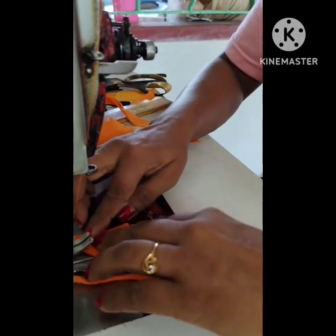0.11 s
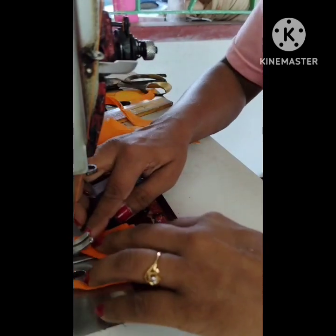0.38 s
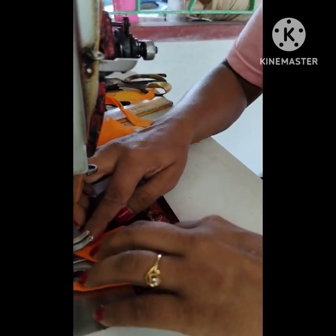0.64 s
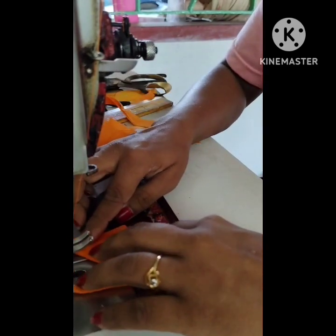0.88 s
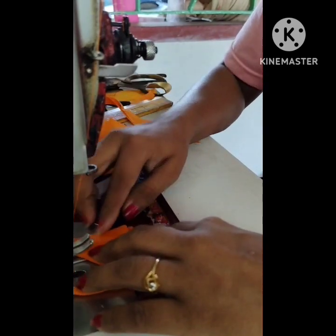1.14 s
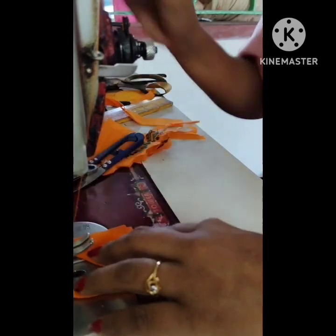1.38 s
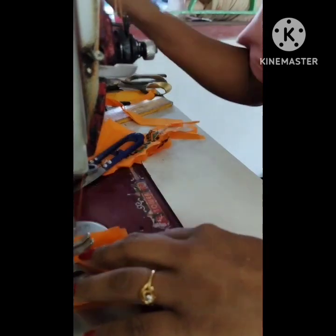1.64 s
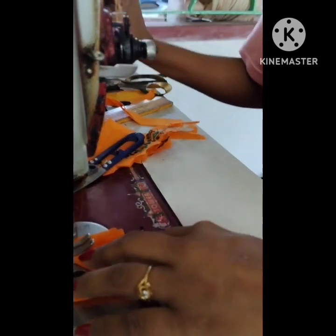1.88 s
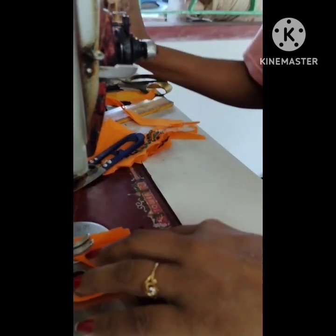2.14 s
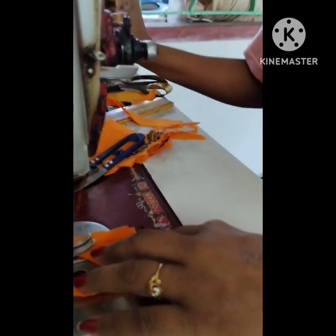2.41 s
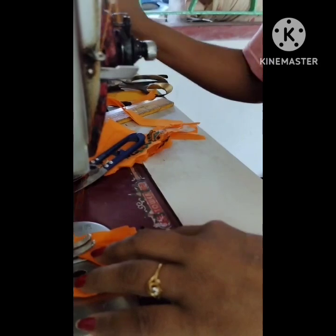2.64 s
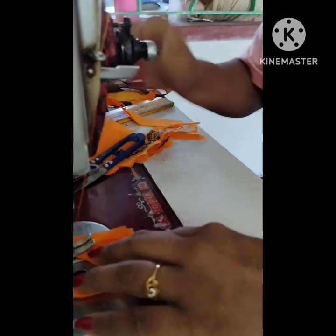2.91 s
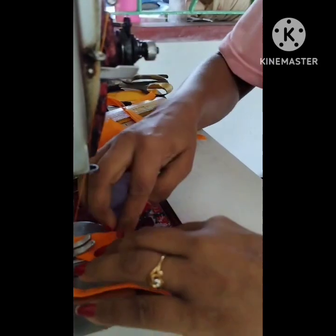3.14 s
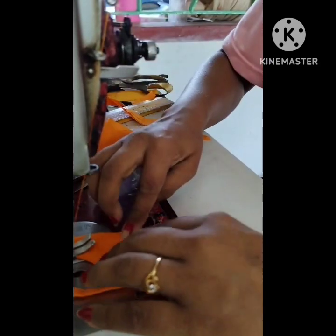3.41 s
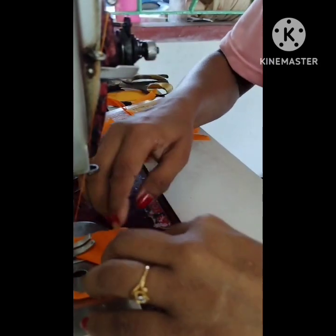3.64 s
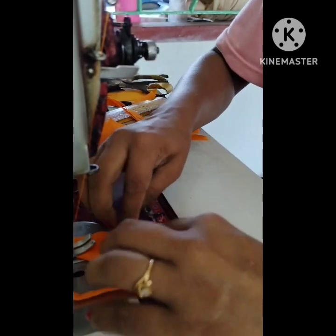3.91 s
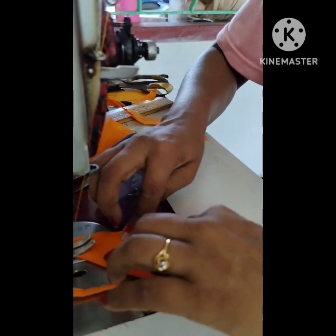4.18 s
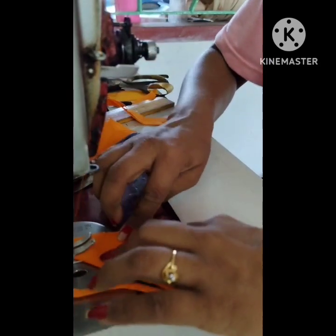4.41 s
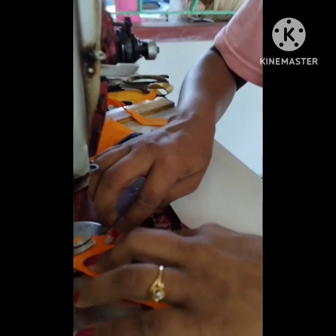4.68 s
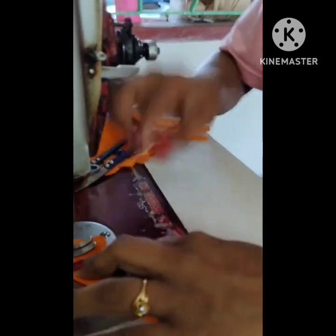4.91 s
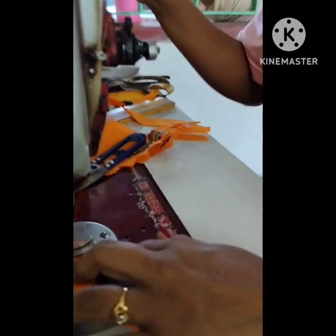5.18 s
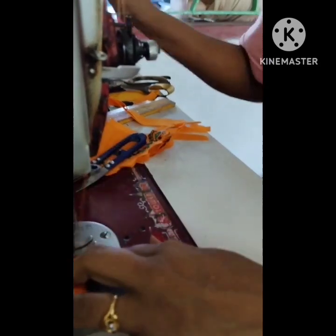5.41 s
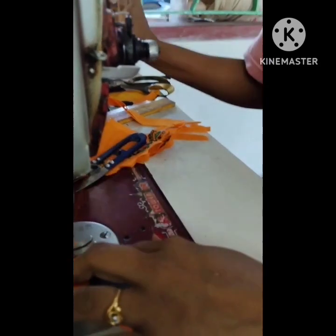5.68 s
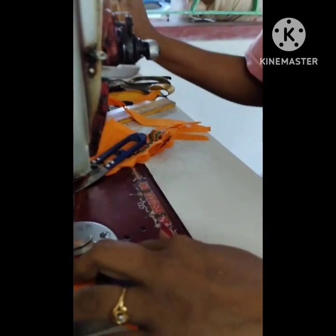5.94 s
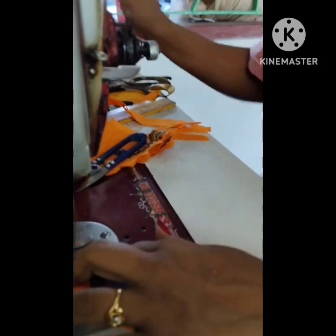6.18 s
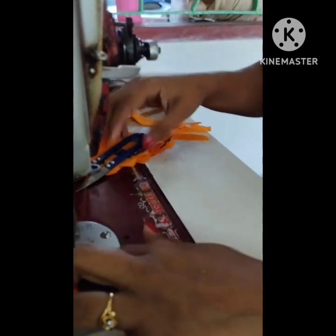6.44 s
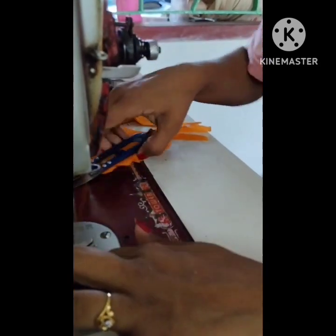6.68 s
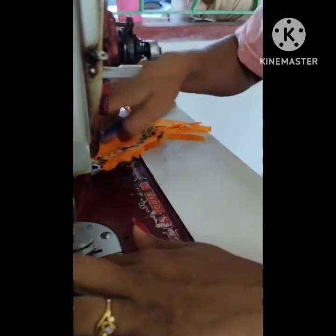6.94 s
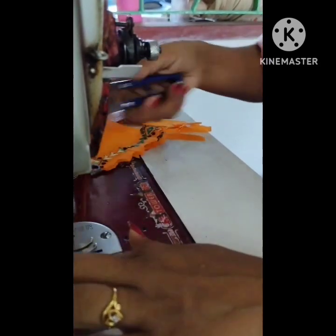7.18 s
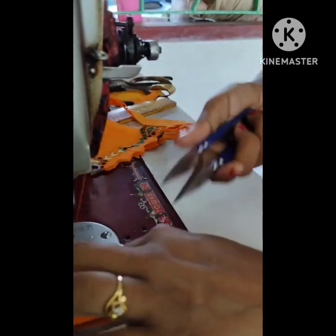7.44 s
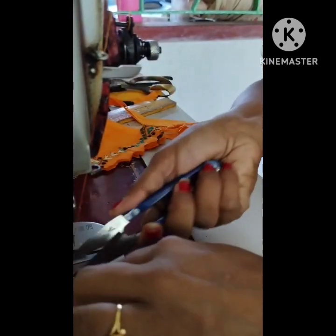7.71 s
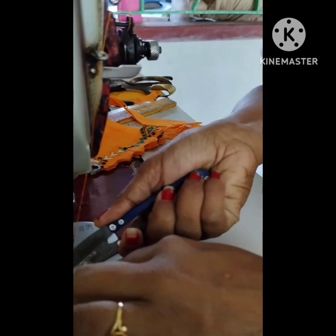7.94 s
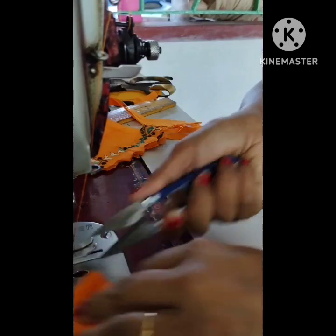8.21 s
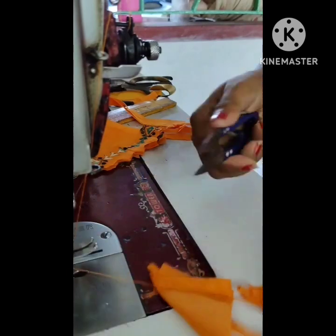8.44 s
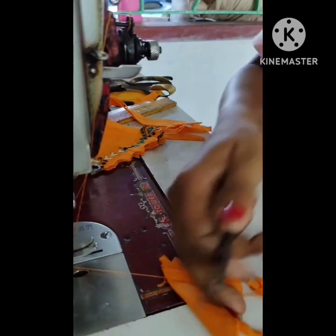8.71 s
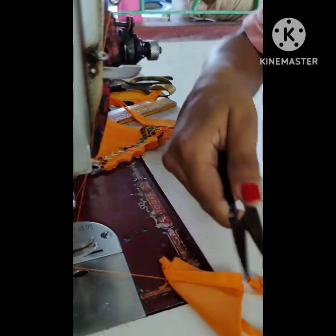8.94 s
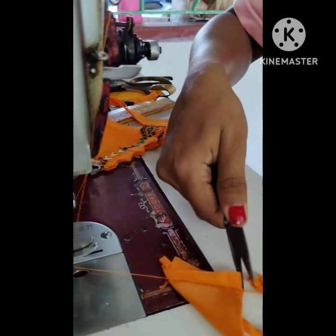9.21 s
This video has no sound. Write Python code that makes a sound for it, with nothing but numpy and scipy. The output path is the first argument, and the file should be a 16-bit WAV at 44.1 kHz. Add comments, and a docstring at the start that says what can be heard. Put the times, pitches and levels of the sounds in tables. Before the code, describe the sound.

A sewing machine chatters through two rapid clacking runs on a wooden table, slows to light ticks, then scissors snip sharply once close by.

```python
"""A treadle sewing machine stitches two seams on a wooden table in a small room, close to a phone's two microphone ports.
Each half turn of the shaft clacks steel on steel (shaped noise), knocks the table, shakes the frame and rings
small parts (decaying modes). The belt squeals on a gliding tone as the wheel is pushed off; short rough tones follow.
Thread snips close to the ports shut and slide open (noise on blade resonances); a spring pings.
Behind it lies an airy hum, with a rustle and thin flickering tones near the end."""
import sys
import numpy as np
from scipy import signal
from scipy.fft import rfft, irfft, next_fast_len
from scipy.io import wavfile
from scipy.ndimage import uniform_filter1d, map_coordinates

SR = 44100
rng = np.random.default_rng(int(sys.argv[2]) if len(sys.argv) > 2 else 0)


def boost(x):
    """Linear amplitude factor 10**(x/20) for a level x in decibels (scalar or array-like)."""
    u = np.asarray(x, float) / 20
    return 10 ** u


def inscribe(sig):
    """Save sig as 16-bit PCM at rate SR to the path in sys.argv[1].

    A 1-D sig is mono; a 2-D sig holds one channel per row.
    Samples are clipped to [-1, 1] before scaling.
    """
    pcm = np.round(np.clip(np.atleast_2d(sig).T, -1, 1) * 32767)
    wavfile.write(sys.argv[1], SR, pcm.astype(np.int16))


N = 411717  # length [samples]


def unit(x):
    """Scaled to rms 1."""
    return x / np.sqrt(np.mean(x ** 2) + 1e-20)


def along(points, hz):
    """Reads (frequency, value) points on a log frequency axis."""
    f, v = np.transpose(points)
    return np.interp(np.log(hz + 1), np.log(f + 1), v)


def curves(rows):
    """One value per sample for each column after the time."""
    s, *cols = np.transpose(rows)
    return [np.interp(np.arange(N) / SR, s, c) for c in cols]


def wobble(rate):
    """A smooth random curve, rate knots a second."""
    knots = rng.standard_normal(int(N * rate / SR) + 4)
    return map_coordinates(knots, [np.arange(N) * rate / SR])


def filtered(x, response):
    """x times a complex response of frequency."""
    m = next_fast_len(N + SR // 2)
    return irfft(rfft(x, m) * response(np.fft.rfftfreq(m, 1 / SR)), m)[..., :N]


def body(modes):
    """Causal response of resonances (frequency, width, level), with alternating signs."""
    def response(f):
        return sum((-1) ** k * boost(db) * 1j * f * w / (c * c - f * f + 1j * f * w)
                   for k, (c, w, db) in enumerate(modes))
    return response


def rattle(starts, levels_db, rise, t60):
    """Gain per sample of contacts whose powers add: each builds up over rise and dies over t60 [s]."""
    t = np.arange(SR // 4) / SR
    shape = (1 - np.exp(-t / rise)) ** 2 * boost(-120 * t / t60)  # a power, hence twice 60 dB
    blows = np.bincount(np.round(starts * SR).astype(int), boost(2 * levels_db), N)
    return np.sqrt(np.abs(signal.fftconvolve(blows, shape / shape.max())[:N]))


def struck(response, starts, levels_db, rise, t60, grit_db=0, grit_rate=300):
    """Two faces of a body shaken by noisy contacts, whose force comes in uneven jolts; 0 dB peaks near 1."""
    one = rattle(np.zeros(1), np.zeros(1), rise, t60)[:SR // 4] ** 2
    echo = filtered(np.eye(1, N)[0], response)[:SR // 4] ** 2
    top = np.sqrt(signal.fftconvolve(one, echo).max())
    force = rattle(starts, levels_db, rise, t60) * unit(boost(grit_db * wobble(grit_rate)))
    return filtered(force * rng.standard_normal((2, N)), response) / top


def rung(response, starts, levels_db):
    """Two faces of a body after single clean blows; 0 dB peaks at 1."""
    at = np.round(starts * SR).astype(int)
    turn = 2 * np.pi * rng.random(len(at))
    faces = (np.ones_like(turn), np.sqrt(2) * np.sin(turn))
    blows = np.array([np.bincount(at, boost(levels_db) * face, N) for face in faces])
    return filtered(blows, response) / np.abs(filtered(np.eye(1, N)[0], response)).max()


# colour of the room's hum and hiss: (frequency [Hz], relative density [dB per Hz])
AIR_COLOUR = [(25, -6.5), (108, -7.5), (137, -15.5), (185, -7.5), (335, -2.5), (575, -13.5), (695, -6.5),
              (775, -12), (2600, -20.5), (3400, -29.5), (8000, -35), (11000, -48), (15500, -47)]
# likeness of the air at the left and right ports: (frequency [Hz], correlation [-1 to 1])
AIR_LIKENESS = [(60, 0.9), (180, 1), (550, 0.15), (1650, -0.21), (15000, 0.11)]
# slow course of the air: (time [s], relative level [dB])
AIR_COURSE = [(0, 7), (1.3, 8), (3.2, 3), (9.33, 2)]


def air():
    """Noise shaped into hum and hiss, with faint patches in time and frequency, stronger at the left port."""
    z = signal.stft(rng.standard_normal((2, N)), nperseg=512)[2]
    patches = uniform_filter1d(uniform_filter1d(rng.standard_normal(z.shape[1:]), 6, 0), 14, 1)
    pair = signal.istft(z * boost(unit(patches)), nperseg=512)[1][:, :N]

    def split(hz):
        turn = np.arccos(np.clip(along(AIR_LIKENESS, hz), -1, 1)) / 2
        return boost(along(AIR_COLOUR, hz)) * [np.cos(turn), np.sin(turn)]

    mid, side = filtered(pair, split)
    level = boost(-45 + curves(AIR_COURSE)[0] + [[1.5], [-1.5]])
    return level * np.array([mid + side, mid - side]) / np.std(mid)


# faint thin tones near the end: (frequency [Hz], level [dB])
THIN_TONES = [(5280, -59), (6200, -62), (6850, -64)]


def thin_tones():
    """Sines of wavering level and phase that swell and fade around 8.91 s, the same at both ports."""
    t = np.arange(N) / SR
    tones = sum(boost(db + 3 * wobble(30)) * np.sin(2 * np.pi * hz * t + 0.6 * wobble(60))
                for hz, db in THIN_TONES)
    return tones * np.exp(-((t - 8.91) / 0.15) ** 2)


def cloth():
    """Cloth is drawn away: a broad rustle of noise around 5950 Hz, for about half a second."""
    t = np.arange(N) / SR
    rustle = unit(filtered(rng.standard_normal((2, N)), body([(5950, 2700, 0)])))
    return boost(-55.5) * rustle * np.exp(-((t - 8.85) / 0.31) ** 4)


# how much of a source both ports share: (frequency [Hz], correlation [0 to 1])
SHARED = [(80, 1), (400, 1), (800, 0.56), (3000, 0.34), (10000, 0.05)]
# reverberation of the small room: (frequency [Hz], t60 [s])
ROOM_T60 = [(1500, 0.22), (10000, 0.15)]
# room over direct sound, before a source's own offset: (frequency [Hz], level [dB])
ROOM_LEVEL = [(100, -6), (12000, -13.5)]
# level at the left port over the right: (frequency [Hz], level [dB])
LEFT_LEAN = [(90, 6), (200, 3.5), (600, 5), (1650, 0), (4970, -1.5), (15000, -6.5)]


def room(faces, lead, wet_db=0):
    """The ports share part of a source, each with its lead and lean; the walls answer each port differently."""
    def split(f):
        turn = np.arccos(np.clip(along(SHARED, f), 0, 1)) / 2
        return np.array([np.cos(turn), np.sin(turn)])

    mid, side = filtered(faces, split)
    ports = np.array([mid + side, mid - side])
    hz, t, z = signal.stft(rng.standard_normal((2, SR // 3)), SR, nperseg=256)
    tail = signal.istft(z * boost(-60 * t / along(ROOM_T60, hz)[:, None]), SR, nperseg=256)[1]
    late = np.pad(ports, ((0, 0), (200, 0)))  # the tail starts 200 samples after the direct sound
    wet = signal.fftconvolve(late, tail / np.linalg.norm(tail[0]), axes=1)[:, :N]
    wet = filtered(wet, lambda f: boost(wet_db + along(ROOM_LEVEL, f)))
    sides = np.array([[0.5], [-0.5]])
    direct = filtered(ports, lambda f: np.exp(1j * sides * along(lead, f)))
    return filtered(direct + wet, lambda f: boost(sides * along(LEFT_LEAN, f)))


# a thin spring is plucked: (time [s], relative level [dB])
SPRING_PLUCKS = [(2.93, -36), (3.14, -37), (6.57, -34), (7.319, -39), (7.468, -38), (7.566, -38),
                 (7.702, -37), (7.935, -37)]


def pings():
    """The spring sounds one tone and a weak octave that swell and fade, slightly louder at the left port."""
    out, t = np.zeros(N + SR), np.arange(SR // 10) / SR
    swell = (1 - np.exp(-t / 0.004)) * np.exp(-(t / 0.024) ** 2)
    turn = 2 * np.pi * 1822 * t
    tone = swell * (np.sin(turn) + 0.1 * np.sin(2 * turn))
    for s, db in SPRING_PLUCKS:
        out[round(s * SR):][:len(t)] += boost(db + 3) * tone
    return out[:N] * boost([[1], [-1]])  # left up 1 dB, right down 1 dB


# resonances of the blades: (frequency [Hz], width [Hz], relative level [dB])
BLADE_MODES = [(720, 85, 15), (1200, 520, 5), (2580, 420, 5), (3140, 260, 0)]
# the blades slide apart: (time [s], level [dB])
BLADE_SLIDES = [(8.35, -44), (8.372, -41.5)]
# a blade tip rings alone: (time [s], level [dB])
TIP_TICKS = [(8.227, -26.5), (8.754, -42)]


def snips():
    """The blades crack shut and shiver, slide open with a thin hiss; a tip ticks."""
    def blades(f):
        return 0.37 * f / (f + 600) / (1 + f / 9000) + body(BLADE_MODES)(f)

    at, db = np.array([8.2147]), np.array([-4.0])  # the blades meet: time [s], level [dB]
    crack = rung(blades, at, db)
    shiver = struck(blades, at, db - 16, rise=0.00035, t60=0.03)
    thin = body([(4000, 1600, -1), (8000, 1000, 1.5), (13000, 3200, -1)])
    slide = struck(thin, *np.transpose(BLADE_SLIDES), rise=0.0073, t60=0.11)
    tick = struck(body([(2620, 340, 0)]), *np.transpose(TIP_TICKS), rise=0.001, t60=0.024)
    return crack + shiver + slide + tick


# short rough tones: slips of the belt, and one brief ping at 4.456 s:
# (time [s], frequency [Hz], level [dB])
SHORT_TONES = [(1.951, 2270, -24), (4.456, 1790, -29), (4.582, 2570, -28), (5.659, 2660, -28),
               (5.685, 2440, -24)]


def short_tones():
    """Each is a rough tone, noise on a narrow resonance, of a few hundredths of a second."""
    return sum(struck(body([(hz, 120, 0)]), np.array([s]), np.array([db]), rise=0.0049, t60=0.045)
               for s, hz, db in SHORT_TONES)


# the belt's squeal as the wheel is pushed off: (time [s], frequency [Hz], relative level [dB])
BELT_SQUEAL = [(1.488, 1900, -32), (1.498, 2054, -28), (1.528, 2194, -22), (1.534, 2485, -22),
               (1.546, 2810, -18), (1.572, 2800, -17.5), (1.595, 2754, -19), (1.607, 2950, -21),
               (1.62, 2770, -31)]


def belt():
    """Stick-slip squeal that climbs, with an octave only below 2400 Hz; a rasp and a hiss swell along."""
    hz, db = curves(BELT_SQUEAL)
    t = np.arange(N) / SR
    turn = 2 * np.pi * np.cumsum(hz * (1 + 0.03 * wobble(900))) / SR
    tone = unit(boost(3 * wobble(250))) * (np.sin(turn) + (hz < 2400) * 0.25 * np.sin(2 * turn))
    sounding = (db > db[-1]) * (db > db[0])  # silent outside the table's times
    swell = np.exp(-((t - 1.578) / 0.028) ** 2)
    grains = unit(boost(1.9 * wobble(500))) * rng.standard_normal((2, 2, N))
    rasp = unit(filtered(grains[0], body([(970, 110, 0.6), (1440, 720, 2.4)]))) * swell ** 2
    hiss = unit(filtered(grains[1], steel)) * swell
    return sounding * boost(db) * tone + boost(-15.5) * rasp + boost(-20.5) * hiss


# resonances of the wooden table top: (frequency [Hz], width [Hz], relative level [dB])
TABLE_MODES = [(163.7, 67, -6), (248, 46, -5), (324.8, 36, 2), (400, 38.4, 0), (460.6, 47, -3.5),
               (619, 47, -10.5), (732, 55, -11.5)]


def table_top(f):
    """Response of the table top."""
    return body(TABLE_MODES)(f)


# resonances of the frame under the table: (frequency [Hz], width [Hz], relative level [dB])
FRAME_MODES = [(102.4, 22.4, 6.5), (134.6, 22, 0)]


def frame(f):
    """Response of the frame, weak below 90 Hz."""
    return body(FRAME_MODES)(f) / (1 + (90 / (f + 1)) ** 8)


# soft knocks on the table alone: (time [s], level [dB])
SOFT_KNOCKS = [(1.399, -19.5), (1.4836, -14), (2.983, -13.5), (4.366, -22.5), (7.764, -20.5), (7.79, -27),
               (8.653, -23.5)]


def thuds():
    """Clean blows ring the table top, softened above 900 Hz."""
    return rung(lambda f: table_top(f) / (1 + 1j * f / 900), *np.transpose(SOFT_KNOCKS))


# the treadle jolts the frame: (time [s], level [dB])
TREADLE_JOLTS = [(0.119, -24.5), (0.564, -24), (0.654, -24.5), (1.073, -27), (1.119, -26), (1.238, -24.5),
                 (1.59, -12), (1.722, -8), (1.83, -8), (1.96, -12), (2.913, -19), (4.381, -26.5),
                 (4.504, -15), (5.825, -9.5)]


def treadle():
    """Clean blows ring the frame and, more weakly, the table, softened above 250 Hz."""
    def response(f):
        return (frame(f) + boost(-8.0) * table_top(f)) / (1 + 1j * f / 250)
    return rung(response, *np.transpose(TREADLE_JOLTS))


def swings():
    """Seconds of free motion before each full stroke, up to a limit."""
    s = np.transpose(STROKES)[0]
    return np.minimum(np.diff(s, prepend=s[0] - 1), 0.093)


# force that goes down into the table at the strokes: (time [s], relative level [dB])
TABLE_FORCE = [(1.48, -17), (1.7, -12.5), (1.93, -18.5), (2.2, -14.5), (2.86, -21.5), (2.95, -25.5),
               (4.45, -18), (4.65, -14.5), (4.85, -13), (5.4, -15), (6.2, -17), (6.75, -17.5), (7.6, -18)]


def blows():
    """Times and levels of the blows that reach the table; they follow the clacks only slightly."""
    s, db, _ = np.transpose(STROKES)
    return s, np.interp(s, *np.transpose(TABLE_FORCE)) + 0.12 * (db - db.mean())


def frame_boom():
    """The frame booms a little after each blow; a slower shaft shakes it less."""
    lag_s, sag_db_per_s = 0.0066, 87
    at, db = blows()
    return struck(frame, at + lag_s, db - 4 - sag_db_per_s * swings(), rise=0.0016, t60=0.15)


def needle_bar():
    """The bar bottoms out after each stroke: a clean low blow, then two rebounds, weaker on average."""
    lag_s, rebound_s, rebound_db = 0.006, 0.014, -2
    at, db = blows()
    late, size = np.transpose(rng.standard_normal((len(at), 3, 2)), (2, 0, 1))
    count = np.arange(3)
    blow_s = at[:, None] + lag_s + rebound_s * count * (1 + 0.122 * late)
    blow_db = db[:, None] - 1 + rebound_db * count + 3 * size
    return rung(lambda f: (frame(f) + table_top(f)) / (1 + 1j * f / 500), blow_s.ravel(), blow_db.ravel())


def shafts():
    """Shafts and belt rumble in the table and whirr in the steel while contacts keep coming."""
    s, db, _ = np.transpose(STROKES + TICKS)
    rumble = struck(table_top, s, db - 22, rise=0.02, t60=0.36, grit_db=5, grit_rate=60)
    at, stroke_db, _ = np.transpose(STROKES)
    whirr_db = stroke_db - 26 - 43 * swings()  # a slower shaft whirrs less
    whirr = struck(lambda f: steel(f) * (1 + (f / 11000) ** 2), at, whirr_db,
                   rise=0.023, t60=0.47, grit_db=4.0, grit_rate=58)
    return rumble + whirr


def table_knocks():
    """Each blow knocks the table top, after a moment to pass through the machine's bed."""
    lag_s, scatter_db = 0.0033, 0.5
    at, db = blows()
    db = db + scatter_db * rng.standard_normal(len(at))
    return struck(table_top, at + lag_s, db, rise=0.00048, t60=0.11, grit_db=1.5, grit_rate=210)


def between():
    """Small parts chatter at random moments after each stroke."""
    s, db, _ = np.transpose(STROKES)
    late, size = np.transpose(rng.random((len(s), 7, 2)), (2, 0, 1))
    at = s[:, None] + 0.0173 + 0.064 * late
    level_db = db[:, None] - 24 - 10 * size
    return struck(steel, at.ravel(), level_db.ravel(), rise=0.0011, t60=0.035, grit_db=4.5, grit_rate=2000)


def loose():
    """Loose steel parts bounce after each contact: short clinks, each on a pitch of its own."""
    s, db, _ = np.transpose(STROKES + TICKS)
    late, size, pitch, phase = np.transpose(rng.random((len(s), 10, 4)), (2, 0, 1))
    hz = (1000 * 8 ** pitch).ravel()[:, None]
    t = np.arange(SR // 50) / SR
    level_db = (db[:, None] - 20 - 12 * size).ravel()[:, None]
    clinks = boost(level_db - 60 * t / 0.033) * np.sin(2 * np.pi * hz * t)
    starts = np.round((s[:, None] + 0.055 * late) * SR).astype(int)
    at = (starts.ravel()[:, None] + np.arange(len(t))).ravel()
    turn = 2 * np.pi * phase.ravel()[:, None]
    faces = (np.ones_like(turn), np.sin(turn) * np.sqrt(2))
    return np.array([np.bincount(at, (clinks * face).ravel(), N) for face in faces])


def ringing(starts, levels_db, modes):
    """Every stroke rings the modes of a steel part in new proportions, differently on its two faces."""
    scatter_db = 3.5
    hz, db, t60 = np.transpose(modes)
    t = np.arange(SR // 20)[:, None] / SR
    tones = boost(db - 60 * t / t60) * np.sin(2 * np.pi * hz * t) * (1 - np.exp(-t / 0.0016))
    size, face = np.transpose(rng.standard_normal((len(starts), len(hz), 2)), (2, 0, 1))
    gain = boost(levels_db[:, None] + scatter_db * size)
    at = (np.round(starts * SR).astype(int)[:, None] + np.arange(len(t))).ravel()
    return np.array([np.bincount(at, (g @ tones.T).ravel(), N) for g in (gain, gain * face)])


# strokes that catch the needle plate square and ring it clear: time [s]
SQUARE_STROKES = [2.0344, 2.1082, 2.2136, 2.341, 2.4129, 2.4924, 4.5964, 4.6394, 4.6834, 5.0572, 5.3043,
                  5.3799, 5.465, 5.6722, 5.7496, 5.8727, 5.9416, 6.0147, 6.2663, 6.534, 6.6078, 6.737,
                  6.8928, 6.986, 7.067, 7.162]
# modes of the needle plate: (frequency [Hz], relative level [dB], t60 [s])
PLATE_MODES = [(2795, -9.5, 0.025)]


def needle_plate():
    """The plate rings after square strokes; the longer the swing, the louder."""
    at, db, _ = np.transpose(STROKES)
    level_db = np.interp(SQUARE_STROKES, at, db + 140 * swings())
    return ringing(np.array(SQUARE_STROKES), level_db, PLATE_MODES)


# modes of the arm: (frequency [Hz], relative level [dB], t60 [s])
ARM_MODES = [(1284, -6.5, 0.1), (1825, -5.5, 0.019), (2210, 6, 0.015), (3650, -10.5, 0.087),
             (4160, 3, 0.013), (7340, -13, 0.0097)]


def arm():
    """The longer the swing before a stroke, the freer the arm rings."""
    at, db, _ = np.transpose(STROKES)
    moving = np.diff(at, prepend=0) < 1  # a start from rest has no swing
    return ringing(at + 0.001068, db - 28.5 + 192 * swings() * moving, ARM_MODES)


def slack():
    """Slack is taken up with a small tick before each stroke."""
    at, db, _ = np.transpose(STROKES)
    return struck(steel, at - 0.0082, db - 24, rise=0.002, t60=0.069)


# broad colour of the clack: (frequency [Hz], relative density [dB per Hz])
CLACK_COLOUR = [(410, 5.5), (700, -1.5), (875, -4.5), (1770, -2), (2560, -6), (2800, -2), (3370, -8),
                (7390, -8.5), (15000, -29.5), (16000, -27)]
# resonances of the cast head: (frequency [Hz], width [Hz], relative level [dB])
HEAD_MODES = [(1740, 180, -5.5), (3530, 110, 3), (4363, 124, -4)]


def steel(f):
    """Broad clack colour with the resonances of the cast head on it."""
    colour = boost(along([(300, -58)] + CLACK_COLOUR + [(17000, -92)], f))
    return colour * (0.69 + 1.04 * body(HEAD_MODES)(f))


# steel meets steel in the head, each half turn of the shaft:
# (time [s], relative level [dB], treble over the whole [dB])
STROKES = [(1.481, -18, -19), (1.6328, -9, -14.5), (1.698, -5, -16), (1.726, -4.5, -18),
           (1.7448, -11.5, -7.5), (1.8008, -9.5, -12), (1.8393, -11, -43.5), (1.8583, -16.5, -7),
           (1.93, -11.5, -15), (1.956, -19, -29), (1.9861, -7, -9.5), (2.0349, -6.5, -15),
           (2.069, -14, -15.5), (2.1091, -6, -12), (2.14, -7, -14), (2.1759, -11.5, -10),
           (2.2139, -4, -12.5), (2.258, -8.5, -13), (2.2979, -7, -13.5), (2.341, -5.5, -14),
           (2.3814, -36, -15.5), (2.4133, -8.5, -8.5), (2.4509, -7.5, -14.5), (2.4924, -8.5, -10.5),
           (2.5346, -15, -45), (2.587, -9, -13), (2.637, -11.5, -8.5), (2.704, -13.5, -18),
           (2.7602, -23.5, -16), (2.777, -22, -39), (2.8599, -14, -16), (2.9476, -29.5, -56),
           (4.4524, -16.5, -11), (4.5187, -15.5, -18), (4.532, -14, -10.5), (4.5963, -6.5, -15.5),
           (4.6392, -6, -12), (4.6835, -7, -12), (4.75, -7, -14.5), (4.808, -7.5, -17.5), (4.86, -8.5, -19),
           (4.9207, -9.5, -15.5), (4.9861, -8.5, -15), (5.0575, -9, -10), (5.1219, -7.5, -18),
           (5.1786, -9.5, -16), (5.239, -7, -12), (5.3048, -9.5, -17), (5.38, -9.5, -10.5),
           (5.464, -10.5, -12), (5.5077, -14.5, -11), (5.5663, -11.5, -17), (5.621, -9, -10.5),
           (5.6721, -9.5, -11), (5.7497, -9, -13.5), (5.8118, -9, -15.5), (5.8722, -9, -14.5),
           (5.9412, -8.5, -9), (6.0151, -8.5, -9.5), (6.0769, -9, -14.5), (6.131, -10.5, -18),
           (6.1989, -8, -17), (6.2676, -7, -7), (6.33, -9.5, -16), (6.3907, -8, -19.5), (6.458, -9.5, -14),
           (6.534, -9.5, -11), (6.6078, -10, -15.5), (6.6711, -11, -16), (6.738, -7.5, -12.5),
           (6.8113, -9, -10.5), (6.8925, -9.5, -11.5), (6.986, -10, -11.5), (7.067, -9, -10.5),
           (7.162, -11, -12), (7.271, -13, -15), (7.4087, -15, -19), (7.6056, -20, -11.5)]
# light ticks of loose linkage that do not knock the table, only feed its rumble:
# (time [s], relative level [dB], treble over the whole [dB])
TICKS = [(1.402, -26.5, -42), (1.6728, -18, -7), (2.8429, -30, -8), (2.93, -18, -19), (3.1085, -33, -9),
         (3.1377, -24, -12), (7.3183, -32, -6), (7.3837, -24, -14), (7.4669, -25.5, -12),
         (7.555, -28.5, -15), (7.567, -22.5, -11), (7.7, -25, -10.5), (7.9347, -24, -11)]


def clacks():
    """Each contact is a few ms of noisy chatter, dull and sharp, then a scrape."""
    s, db, treble_db = np.transpose(STROKES + TICKS)
    bright_db = treble_db - np.median(treble_db)  # no two contacts land on the same spot

    def low(f):
        return 1 / (1 + (f / 3200) ** 4)

    dull = struck(lambda f: steel(f) * low(f), s, db - 9.5 - 0.095 * bright_db,
                  rise=0.00033, t60=0.054, grit_db=4.5, grit_rate=1200)
    sharp = struck(lambda f: steel(f) * (1 - low(f)), s, db - 14 + bright_db,
                   rise=0.0023, t60=0.025, grit_db=1, grit_rate=900)
    scrape = struck(steel, s + 0.01, db - 20 + 0.041 * bright_db,
                    rise=0.0055, t60=0.054, grit_db=1, grit_rate=82)
    return dull + sharp + scrape


# phase by which the machine leads at the left port: (frequency [Hz], phase [rad])
MACHINE_LEAD = [(60, -.8), (330, -.6), (600, .6), (950, 4.7), (1640, 3), (2760, -.5), (5680, -0.6)]


def machine_in_room():
    """All parts of the machine, heard through the room with the machine's own phase between the ports."""
    head = clacks() + slack() + arm() + needle_plate() + loose() + between()
    below = table_knocks() + frame_boom() + needle_bar() + treadle() + thuds()
    drive = shafts() + belt() + short_tones()
    return room(head + below + drive, MACHINE_LEAD)


def scene():
    """Machine and snips in the room; the snips are close by, in phase at both ports."""
    near = room(snips(), [(1, 0)], wet_db=-4)
    background = air() + thin_tones() + cloth()
    return background + pings() + near + machine_in_room()


def low_pass(x):
    """Removes everything above the highest recorded frequency."""
    return signal.sosfilt(signal.butter(12, 16640, fs=SR, output="sos"), x)


def record(dry):
    """The phone rounds off the highest peaks and passes nothing above 15750 Hz."""
    rounded = dry / (1 + np.abs(dry / 1.05) ** 6) ** (1 / 6)
    mix = filtered(rounded, lambda hz: hz < 15750)
    return low_pass(mix)


dry = scene()
out = record(dry)
inscribe(out)
```